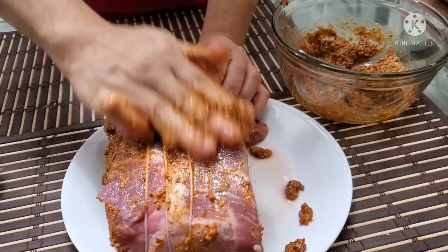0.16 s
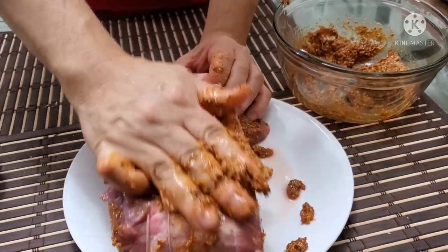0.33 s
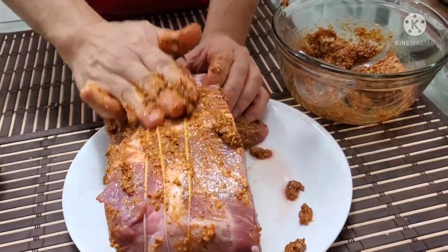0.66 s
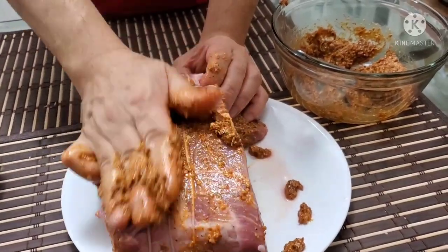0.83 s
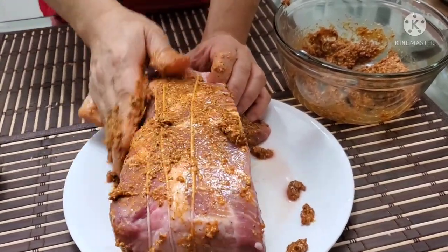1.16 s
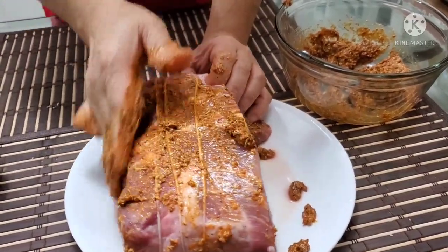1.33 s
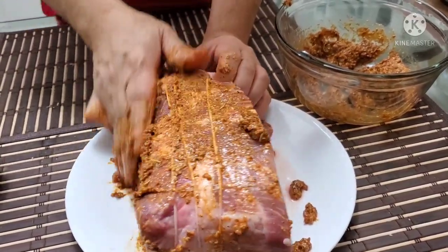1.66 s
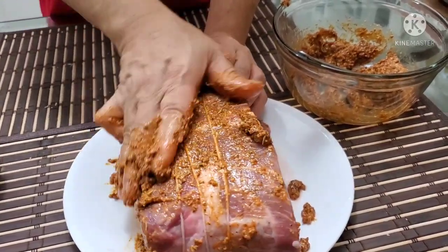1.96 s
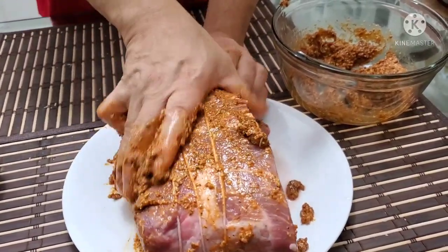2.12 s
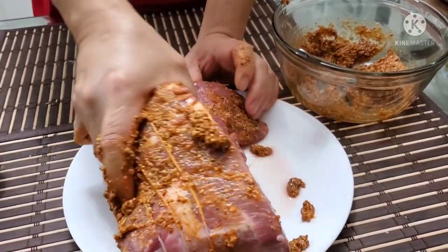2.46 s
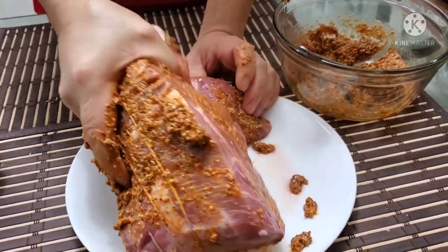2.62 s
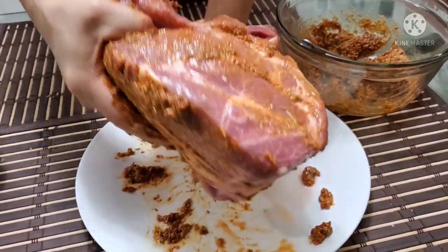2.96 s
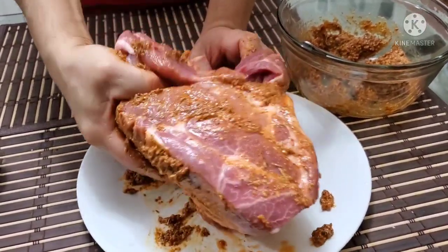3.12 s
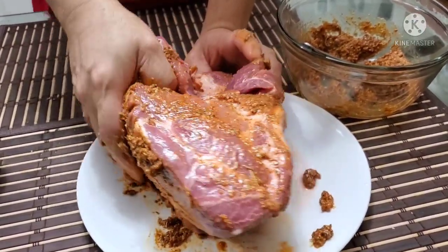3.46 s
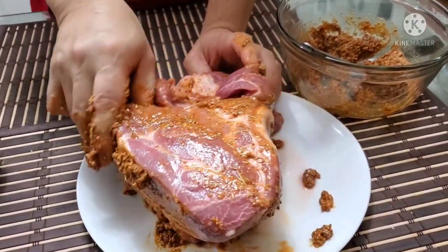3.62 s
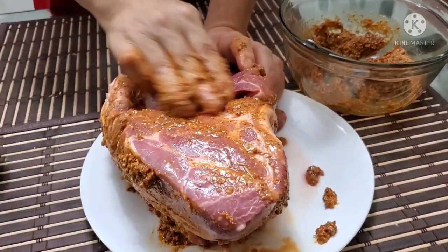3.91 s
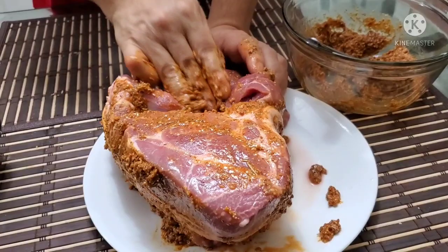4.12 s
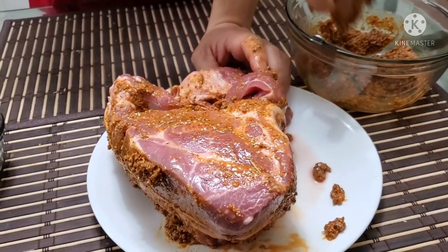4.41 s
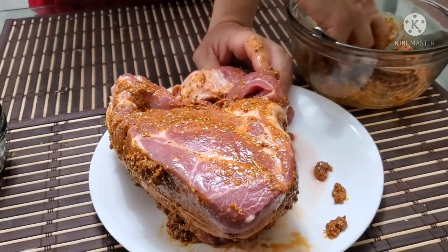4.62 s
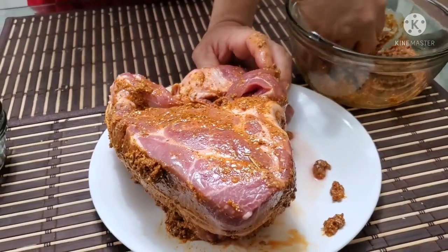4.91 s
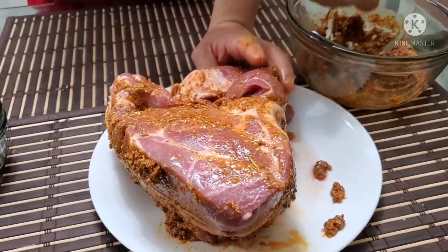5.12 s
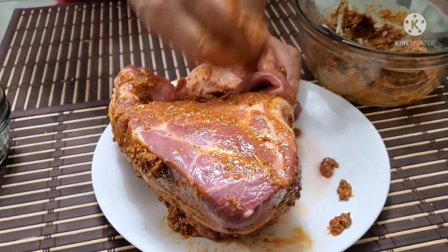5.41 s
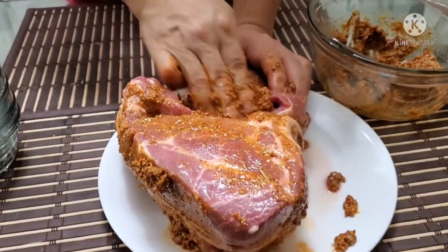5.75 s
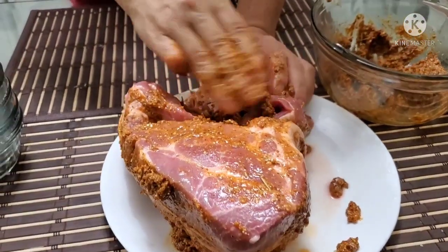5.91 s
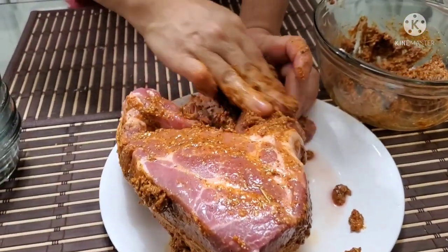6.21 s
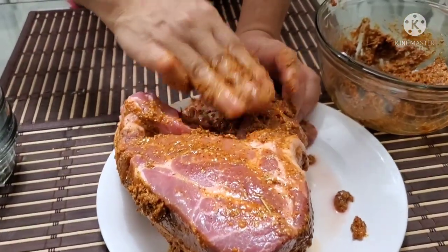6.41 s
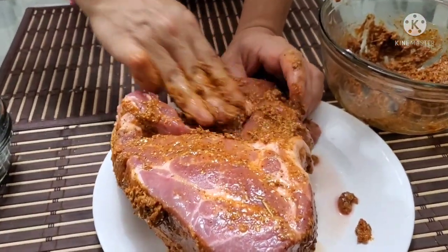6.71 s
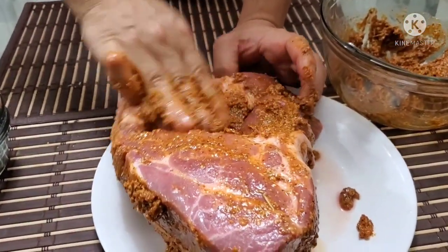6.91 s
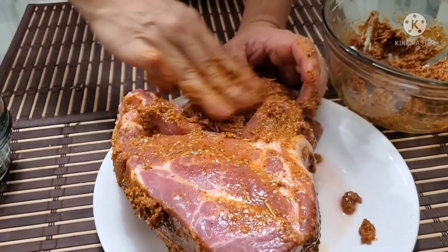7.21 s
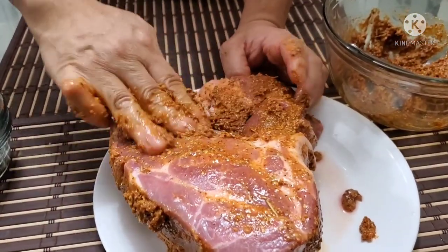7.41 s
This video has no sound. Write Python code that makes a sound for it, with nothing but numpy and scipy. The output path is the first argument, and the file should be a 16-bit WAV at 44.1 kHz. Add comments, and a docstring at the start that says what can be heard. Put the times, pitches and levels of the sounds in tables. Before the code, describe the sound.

Close stereo pickup in a small, hard kitchen. Hands rub wet, grainy paste into raw meat: uneven strokes of fine bright crackle and darker squelch, with tiny high bubble ticks and wet smacks. The strokes peak in a sticky pull, and a plate clacks onto a slatted mat. Rubbing then becomes sparse and faint, with a dull table thump and slight glass ring near five seconds. A distant clock ticks each second over low house hum.

```python
"""Hands rub a wet spice paste into a joint of raw meat: strokes of fine crackle grains and dark squelch grains.
Bubbles tick and wet skin smacks, as short ringing pops. The joint is pulled off its plate, which clacks down as
ceramic modes under a noisy clatter. Fingers bump a glass bowl and the table thumps, both as struck modes. A far
clock rasps each second through the reflections of a small hard kitchen, over the noise and drones of the house."""
import sys
import numpy as np
from scipy import signal
from scipy.fft import rfft, irfft, next_fast_len
from scipy.io import wavfile
from scipy.ndimage import map_coordinates

SR = 44100
rng = np.random.default_rng(int(sys.argv[2]) if len(sys.argv) > 2 else 0)


def gain_from_db(level_db):
    """Turn a decibel level (scalar or array-like) into a linear amplitude factor."""
    decades = np.asarray(level_db, float) / 20
    return 10 ** decades


def unload_audio(sound):
    """Save the sound as a 16-bit wav file, at the path given as the first command line argument."""
    columns = np.transpose(np.atleast_2d(sound))
    # keep every value between -1 and 1, then stretch to whole-number steps
    steps = np.round(np.clip(columns, -1, 1) * 32767)
    wavfile.write(sys.argv[1], SR, steps.astype(np.int16))


N = 333837   # length [samples]

# hand strokes through the paste: (start [s], rise [s], hold [s], crackle level [dB], squelch level [dB],
# squelch centre [Hz])
STROKES = [(0.0, 0.00059, 0.014, -66, -71.5, 3800), (0.101, 0.034, 0.042, -64, -71.5, 3640),
           (0.216, 0.031, 0.078, -71.5, -78, 3540), (0.416, 0.0069, 0.11, -69, -75.5, 2830),
           (0.513, .02, 0.091, -67, -71, 3020), (0.709, 0.047, 0.11, -63, -69, 3630),
           (1.009, .03, 0.12, -59.5, -68, 2420), (1.35, .008, 0.083, -65.5, -68, 3240),
           (1.49, .01, 0.011, -68, -65, 2230), (1.582, .05, 0.033, -58, -64, 3140),
           (1.74, .015, 0.05, -72, -86, 3600), (1.872, 0.032, 0.0076, -63.5, -72.5, 3870),
           (2.181, 0.036, .08, -74, -78.5, 2200), (2.275, .03, 0.078, -73, -72, 2120),
           (2.348, 0.0047, 0.12, -70, -67.5, 1940), (2.532, .006, .02, -71, -56.5, 3300),
           (2.592, 0.007, .12, -64, -66, 3000), (2.738, .005, 0.016, -63, -82, 2900),
           (2.906, .01, 0.0067, -62, -62, 2930), (3.116, 0.01, .02, -77.5, -91.5, 3030),
           (3.21, .01, .04, -79, -78, 3590), (3.31, 0.051, 0.034, -75.5, -92, 4120),
           (3.456, .008, .04, -73, -83, 3680), (3.564, 0.0046, 0.078, -68, -71.5, 3450),
           (3.805, .008, 0.021, -75, -84, 2950), (3.9, 0.0086, .06, -87.5, -82, 2100),
           (4.03, .015, .06, -79.5, -81.5, 2097), (4.1, .01, 0.075, -75, -86.5, 2500),
           (4.26, 0.013, 0.037, -87.5, -78.5, 1970), (4.555, .008, .04, -72.5, -77.5, 2600),
           (4.743, .01, .06, -77.5, -85, 2600), (4.954, 0.013, 0.018, -70, -72, 2520),
           (5.514, .012, .03, -77, -79.5, 3560), (5.604, 0.00567, .02, -69.5, -76.5, 3700),
           (5.654, .006, .02, -73, -94, 3500), (5.686, 0.0042, 0.004, -68, -65.5, 2230),
           (5.844, 0.025, .03, -78.5, -88.5, 2500), (6.046, 0.032, 0.11, -78.5, -93.5, 1980),
           (6.252, 0.022, .04, -73.5, -86, 2400), (6.353, 0.017, 0.044, -83, -87, 2400),
           (6.591, 0.054, 0.066, -73.5, -91.5, 3500), (6.626, 0.0075, .02, -87, -76, 2500),
           (6.908, 0.0086, 0.032, -78, -88.5, 3720), (6.98, 0.045, 0.034, -74.5, -78, 3900),
           (7.288, 0.018, 0.026, -67.5, -80.5, 3900), (7.501, 0.052, .05, -73.5, -80, 3900)]
# colour of the fine crackle: (frequency [Hz], relative level per Hz [dB])
CRACKLE_COLOUR = [(2650, -29), (4500, -6.5), (5680, -7.5), (6700, -1), (7690, -6), (9870, -1.5),
                  (11800, -8.5), (14900, -10.5), (16000, -12.5)]
# colour of the squelch before each stroke is centred: (frequency [Hz], relative level per Hz [dB])
SQUELCH_COLOUR = [(530, -45), (900, -17.5), (1310, -6), (1550, -5.5), (2120, -6), (2480, -6), (2820, -8.5),
                  (3850, 0), (5500, -5.5), (7150, -44.5), (12100, -120)]
# tiny bubbles in the paste burst: (time [s], peak before panning [dB], pitch [Hz], left over right [dB])
BUBBLES = [(0.1471, -51.5, 8750, -3), (0.1935, -58, 9300, -6), (0.5043, -57, 6860, -21),
           (0.5332, -32, 10600, 7.5), (0.6055, -48, 9200, 13), (0.633, -45, 9800, 11),
           (0.7557, -42.5, 9400, 3), (0.7976, -41, 6900, -11), (0.9004, -50, 8800, -4),
           (1.0241, -47, 6860, 9), (1.1223, -48, 14000, 12), (1.1628, -43, 10100, 11),
           (1.3468, -56.5, 6400, -12), (1.6062, -61, 11300, 15), (1.6496, -46, 8460, 4),
           (1.7429, -43.5, 10680, 12), (1.7729, -48.5, 13990, 12), (1.8956, -47, 9450, 8),
           (1.9101, -41.5, 8900, 18), (2.1834, -59.5, 10500, 11), (2.3161, -50, 9380, -18),
           (2.3555, -49, 9860, -10), (2.4872, -57.5, 7180, -12), (2.5591, -47, 14540, 11),
           (2.58, -51, 8860, 14), (2.601, -45, 6287, -7), (2.6648, -39.5, 8710, -5.5),
           (2.7172, -48.5, 6840, -10), (2.7417, -37, 6360, -7), (2.7601, -34, 11000, 6),
           (2.9113, -45, 9600, 7), (2.9357, -44.5, 9980, 7.5), (3.2221, -56.5, 8430, -1.5),
           (3.3014, -49, 11100, 8.5), (3.3648, -54.5, 11160, 12), (3.4261, -58, 10470, 16.5),
           (3.4501, -42.5, 10070, 13), (3.5723, -49, 12200, 9.5), (3.8257, -40.5, 11800, 5.5),
           (4.126, -50, 8390, 6), (4.1839, -58, 8360, 11), (4.6059, -59.5, 10300, -16),
           (4.7481, -57.5, 10510, -9.5), (5.5907, -39.5, 9170, 10), (5.6625, -49.5, 6900, -4),
           (5.6935, -37, 9080, 5), (5.888, -61.5, 7630, 3), (6.4004, -55, 8420, 1.5),
           (7.013, -50.5, 8160, 5.5), (7.0394, -47.5, 14140, 13), (7.3123, -40.5, 12500, 6),
           (7.5168, -54, 6570, -5.5)]
# wet skin parts from the meat: (time [s], peak before panning [dB], pitch [Hz], left over right [dB])
SMACKS = [(0.0332, -56, 4240, -17), (0.606, -41.5, 3600, 0.5), (1.034, -54, 3850, 6),
          (1.3473, -44, 3280, 1), (1.5025, -56, 2120, 14), (1.6062, -45, 2390, 3),
          (1.6322, -34, 4100, 14.5), (1.6496, -43, 2240, -12), (1.9101, -55, 4100, 17),
          (2.5356, -26, 3301, -0.5), (2.5484, -32.5, 3000, 3), (2.5995, -38.5, 2790, -1),
          (2.6958, -37.5, 3250, 2), (2.7417, -18, 3630, -7.5), (2.7554, -31, 2420, 5),
          (3.2221, -51.5, 3230, 6.5), (3.5738, -48, 3540, 14), (3.6117, -58, 3500, 19),
          (5.5218, -53, 3860, 13.5), (5.5932, -42, 3840, 13.5), (5.662, -61, 3870, -9),
          (5.6935, -45, 2040, 8), (6.6263, -51, 2500, -11), (7.5467, -54.5, 4240, 13.5)]
# the plate drops back on the mat and bounces: (time [s], relative strength [dB])
PLATE_CONTACTS = [(2.804, -9.5), (2.8063, -15.5), (2.811, -18.5), (2.816, -26), (2.821, -20),
                  (2.830, -17.5)]
# ringing modes of the ceramic plate: (frequency [Hz], relative level [dB], t60 [s])
PLATE_MODES = [(645, -13, 0.12), (718.6, -8.5, 0.29), (850.4, -11, 0.15), (1130, -8.5, 0.032),
               (1271, -4, 0.08), (1347, -1.5, 0.058), (1600, -14, 0.087), (1756, -8.5, 0.11),
               (1900, -4, 0.041), (2128, -6.5, 0.067), (2584, -2.5, 0.031), (3255, -7, 0.16),
               (3640, -14, 0.045), (4050, -14.5, .1), (6417, -23.5, 0.15)]
# colour of the mat's slats slapping: (frequency [Hz], relative level per Hz [dB])
CLATTER_COLOUR = [(260, -50), (450, -32), (709, -7.5), (1100, -12), (1330, -1.5), (1460, -6), (2620, -5.5),
                  (4990, -17.5), (5700, -32.5), (8980, -25), (15000, -46)]
# blows on the table top: (time [s], relative strength [dB], hardness as low-pass cutoff [Hz],
# ring share scaling the t60 [ratio], rattle start level [dB])
THUMPS = [(0.721, -47, 120, 1, -78), (1.504, -34.5, 306, 0.3, -63), (2.805, -32.5, 147.9, 0.7, -53),
          (3.12, -47, 248, 0.68, -61), (4.57, -51, 496, 0.46, -68), (4.602, -42, 120, .5, -72),
          (4.9658, -19, 252, 1.0, -59), (5.331, -39.5, 200.5, 0.42, -82.5), (6.13, -52.5, 151.5, 0.3, -83)]
# ringing modes of the table: (frequency [Hz], relative level [dB], t60 before the ring share [s])
TABLE_MODES = [(60, -6.5, .2), (71.85, -4.5, 0.4), (100, 0, .3), (133.3, 2, .47), (175.1, -3, .36),
               (240, -1.5, .15), (332, -15.5, 0.23), (468, -16, 0.33)]
# fingers on the glass: (time [s], relative strength [dB])
BOWL_HITS = [(4.572, -73.5), (4.965, -43.5)]
# ringing modes of the glass bowl: (frequency [Hz], relative level [dB], t60 [s])
BOWL_MODES = [(1600, -6, .1), (1640, -3, .14), (2200, -14, .08), (2865, -6, .16), (2902, 0, .22),
              (2945, -9, .1), (4447, -8, .13), (4506, -7, .18), (4565, -11, .15), (6406, -16, .12)]
# each clock tick in turn, before the room: (level [dB])
CLOCK_LEVELS = [-64, -60, -71, -66.5, -67, -67, -78, -71.5]
# decay of the kitchen in octaves: (octave centre [Hz], t60 [s], relative level [dB])
ROOM_OCTAVES = [(344, 0.67, -7), (650, .4, 4), (1460, 0.51, -1), (2900, 0.46, -1.5), (5600, 0.21, 1),
                (11000, .3, 3.5)]
# colour of the house noise: (frequency [Hz], relative level per Hz [dB])
HOUSE_COLOUR = [(13, -44), (22, -16), (55, -3.5), (136, -9.5), (194, -4), (270, -10.5), (328, -9),
                (387, -10.5), (510, -14.5), (837, -20.5), (1100, -31), (3420, -33), (5610, -43),
                (14700, -45.5), (16000, -48.5)]
# narrow drones of appliances: (frequency [Hz], width [Hz], typical rms level [dB])
DRONES = [(54.7, 16, -75), (120, 32, -78.5), (191.34, 8.5, -67), (262.8, 21, -71), (594, 28, -82)]
# how alike the house noise is at left and right: (frequency [Hz], likeness [-1 to 1])
LIKENESS = [(50, 0.66), (250, 1), (1000, 0.11), (4000, 0.11), (12000, .2)]


def rms_one(x):
    """Scale to an rms of 1."""
    return x / np.sqrt(np.mean(x ** 2) + 1e-20)


def at_hz(points, hz):
    """Read a curve of values against frequency, straight on a log frequency axis."""
    point_hz, value = np.array(points)[:, 0], np.array(points)[:, 1]
    return np.interp(np.log(hz), np.log(point_hz), value)


def band(x, low_hz, high_hz):
    """Keep the band between two frequencies."""
    return signal.sosfilt(signal.butter(2, [low_hz, min(high_hz, .45 * SR)], "band", fs=SR, output="sos"), x)


def drift(rate):
    """Slow random wander: normal knots of spread 1, joined by straight lines at the given rate per second."""
    knots = rng.standard_normal(int(N / SR * 60) + 4)
    return map_coordinates(knots, [np.arange(N) / SR * min(rate, 60)], order=1)


def coloured(x, spectrum):
    """Weight the spectrum of x by a colour curve, then scale to an rms of 1."""
    size = next_fast_len(N)
    hz = np.maximum(np.arange(size // 2 + 1) * SR / size, 1)
    weighted = rfft(x, size) * gain_from_db(at_hz(spectrum, hz))
    return rms_one(irfft(weighted, size)[..., :N])


def panned(x, left_db):
    """Place a sound by level; the louder port hears it a few samples later."""
    port_lag_s = 0.000136
    n = np.arange(len(x))
    lag = -np.sign(left_db) * port_lag_s * SR / 2
    left = np.interp(n - 4 + lag, n, x) * gain_from_db(left_db / 2)
    right = np.interp(n - 4 - lag, n, x) * gain_from_db(-left_db / 2)
    return np.array([left, right])


def resonator(hz, t60):
    """Feedback coefficients, decay per sample and angle per sample of one decaying sine mode."""
    r, w = gain_from_db(-60 / (t60 * SR)), 2 * np.pi * hz / SR
    return [1, -2 * r * np.cos(w), r * r], r, w


def struck(times, strengths_db, modes, spread_db):
    """Every blow sets all modes ringing, each with a random strength of its own."""
    at, out = np.round(np.array(times) * SR).astype(int), np.zeros(N)
    chance = rng.standard_normal((len(at), len(modes)))
    for k, (hz, level_db, t60) in enumerate(modes):
        clicks = np.full(N, 1e-18)
        clicks[at] = gain_from_db(np.array(strengths_db) + level_db + spread_db * chance[:, k])
        feedback, _, w = resonator(hz, t60)
        out += signal.lfilter([0, np.sin(w)], feedback, clicks)
    return out


def grains(per_s, size_db, low_hz, high_hz, cycles, spread):
    """Clumps of bursts of widely spread size, each dealt one of ten pitches and a place on the meat; rms 1."""
    born = rng.random(N) < per_s * gain_from_db(6 * drift(25)) / SR
    sizes = born * gain_from_db(size_db * np.minimum(rng.exponential(1, N), 5)) * rng.choice([-1, 1], N)
    where, dealt, out = spread * rng.uniform(-1, 1, N), rng.integers(0, 10, N), 0
    for k, hz in enumerate(np.geomspace(low_hz, high_hz, 10)):
        clicks = sizes * (dealt == k) * np.sqrt(hz) + 1e-18
        pair = [clicks * (1 + where), np.roll(clicks * (1 - where), k % 5)]
        feedback, r, _ = resonator(hz, cycles / hz)
        out = out + signal.lfilter([1 - r, 0, r - 1], feedback, pair)
    return rms_one(out)


def stroked(levels_db, fade_db_per_s):
    """Each stroke rises, sags as the paste thins under the sliding hand, then fades; their powers add."""
    sag_db_per_s = 24
    t, power = np.arange(0, N, 32) / SR, 0
    for (s, rise_s, hold_s, *_), db in zip(STROKES, levels_db):
        rise = np.clip((t - s) / max(rise_s, 1 / SR), 0, 1)
        held = np.clip(t - s - rise_s, 0, hold_s)
        after = np.maximum(t - s - rise_s - hold_s, 0)
        power = power + (rise * gain_from_db(db - sag_db_per_s * held - fade_db_per_s * after)) ** 2
    return np.interp(np.arange(N) / SR, t, np.sqrt(power))


def crackle(levels_db):
    """Fine bright bursts over a hiss of sliding skin, leaning to the left."""
    fine = grains(1200, 3.5, 5500, 15500, cycles=7, spread=.8) + .7 * rng.standard_normal((2, N))
    return stroked(levels_db, fade_db_per_s=130) * coloured(fine, CRACKLE_COLOUR) * gain_from_db([[1.5], [-1.5]])


def squelch(levels_db, centres_hz):
    """Darker, denser, smoother wet bursts, split in third octaves so that each stroke has its own centre."""
    fall_db = 16.0   # loss one octave from the centre, growing as the square of the distance
    wet = grains(1200, 3.0, 1100, 5000, cycles=9, spread=.6) + .8 * rng.standard_normal((2, N))
    wet = coloured(wet, SQUELCH_COLOUR)
    edges = 900 * 2 ** np.arange(0, 3.1, 1 / 3)
    # neighbouring bands take opposite signs
    parts = np.array([(-1) ** k * band(wet, low, high) for k, (low, high) in enumerate(zip(edges, edges[1:]))])
    middle_hz = np.sqrt(edges[:-1] * edges[1:])[:, None]
    colour_db = -fall_db * np.log2(middle_hz / centres_hz) ** 2
    # the bands of a stroke together carry its stated power
    colour_db = colour_db - 10 * np.log10(parts.var(axis=(1, 2)) @ gain_from_db(2 * colour_db))
    return sum(part * stroked(levels_db + db, fade_db_per_s=115) for part, db in zip(parts, colour_db))


def rubbing():
    """Crackle and squelch of every stroke, made uneven as the hand sticks and slips."""
    slip_db, slips_per_s = 0.5, 57
    *_, crackle_db, squelch_db, centres_hz = np.transpose(STROKES)
    return gain_from_db(slip_db * drift(slips_per_s)) * (crackle(crackle_db) + squelch(squelch_db, centres_hz))


def pops(rows, cycles, broad, tear_db, tear_s):
    """A cavity rings and dies 60 dB in some cycles, with a broad snap and the longer noise of the film tearing."""
    length = 1500   # samples
    out, t = np.zeros((2, N + length)), np.arange(length) / SR
    snaps = rng.standard_normal((len(rows), length))
    for (s, peak_db, hz, left_db), snap in zip(rows, snaps):
        shape = (1 - np.exp(-t * hz * 1.5)) * gain_from_db(-60 * t * hz / cycles)
        noise = band(snap, hz * 0.53, hz * 1.1)
        cavity = shape * (np.sin(2 * np.pi * hz * t) + broad * noise)
        body = cavity + gain_from_db(tear_db - 60 * t / tear_s) * noise
        i = round(s * SR)
        out[:, i:i + length] += panned(gain_from_db(peak_db) * body / np.abs(body).max(), left_db)
    return out[:, :N]


def bubble_ticks():
    """Tiny bubbles burst with a high, fairly pure ring."""
    return pops(BUBBLES, cycles=29, broad=0.31, tear_db=-12.0, tear_s=0.01)


def skin_smacks():
    """Wet skin parts with a lower, noisier and more damped ring."""
    return pops(SMACKS, cycles=11, broad=.8, tear_db=-23.0, tear_s=0.12)


def plate():
    """Ceramic modes, damped by the meat, under a broad clatter of mat slats that flares at each contact."""
    s, strength_db = np.transpose(PLATE_CONTACTS)
    t = np.arange(N) / SR
    # each flare rises in 0.91 ms and dies at 60 dB in 40 ms
    flares = sum(np.clip((t - a) / 0.00091, 0, 1) * gain_from_db(db - 7.5 - 60 * np.abs(t - a) / 0.04)
                 for a, db in PLATE_CONTACTS)
    ring = struck(s, strength_db - 10, PLATE_MODES, spread_db=2)
    mid, side = coloured(rng.standard_normal((2, N)), CLATTER_COLOUR)
    both = ring + flares * (mid + 0.49 * side * [[1], [-1]])
    return signal.sosfilt(signal.butter(3, 480, "high", fs=SR, output="sos"), both)


def bowl():
    """A wet fingertip lands softly, so the glass modes swell over 29 ms from silence at each touch."""
    ring = struck(*np.transpose(BOWL_HITS), BOWL_MODES, spread_db=2.5)
    t = np.arange(N) / SR
    swells = [np.where(t < s, 1, np.clip((t - s) / 0.029, 0, 1)) for s, _ in BOWL_HITS]
    return ring * np.prod(swells, axis=0)


def table():
    """A soft contact is a low-passed click into the table modes; the mat and dishes rattle briefly."""
    out, rattle, t = np.zeros(N), np.zeros(N), np.arange(N) / SR
    noise = rms_one(band(rng.standard_normal(N), 250, 2000))
    for s, strength_db, hard_hz, share, rattle_db in THUMPS:
        modes = [(hz, db, t60 * np.clip(share, .1, 1.5)) for hz, db, t60 in TABLE_MODES]
        ring = struck([s], [strength_db - 11.0], modes, spread_db=3.0)
        out += signal.sosfilt(signal.butter(2, max(hard_hz, 30), fs=SR, output="sos"), ring)
        rattle += (t >= s) * gain_from_db(rattle_db - 60 * np.abs(t - s) / 0.04) * noise
    thump = signal.sosfilt(signal.butter(2, 45, "high", fs=SR, output="sos"), out)
    return thump, rattle


def clock():
    """One tick a second: a short narrow rasp of the hand stepping, made to be heard through the room alone."""
    first_s, length_s = .112, 0.03
    centre_hz, width_hz = 1790, 280
    count, since = np.divmod(np.arange(N) / SR - first_s, 1)
    step = np.sin(np.pi * np.clip(since / length_s, 0, 1)) ** .5
    rasp = band(rng.standard_normal(N), centre_hz - width_hz / 2, centre_hz + width_hz / 2)
    return gain_from_db(np.array(CLOCK_LEVELS)[count.astype(int)]) * step * rms_one(rasp)


def kitchen(x, near_db=-2.0, near_t60=0.03, walls_s=0.0043):
    """Dense reflections off plate and table, then walls, each octave dying at its own rate, unlike at the two ears."""
    t = np.arange(SR // 2) / SR
    tail = sum(gain_from_db(db - 60 * t / t60) * band(rng.standard_normal((2, len(t))), hz / np.sqrt(2), hz * np.sqrt(2))
               for hz, t60, db in ROOM_OCTAVES)
    walls = np.clip(t / walls_s, 0, 1) ** 2
    near = gain_from_db(near_db - 60 * t / near_t60)
    tail = tail * (walls + near) * np.clip(t / 0.0018, 0, 1)
    unit_tail = tail / np.sqrt(np.sum(tail ** 2) / 2)
    return signal.fftconvolve(x[None], unit_tail, axes=1)[:, :N]


def house():
    """Broad rumble and hiss, flickering band by band, with the narrow drones of appliances."""
    noise_db = -65.5   # rms
    out, edges = 0, 20 * 2 ** np.arange(0, 10, .5)
    white = rng.standard_normal((2, 2, N))
    for k, (low, high) in enumerate(zip(edges, np.append(edges[1:], 20000))):
        mid, side = band(white[k % 2], low, high)   # neighbouring bands use separate noise
        alike = np.clip(at_hz(LIKENESS, np.sqrt(low * high)), -1, 1)
        pair = np.sqrt(1 + alike) * mid + np.sqrt(1 - alike) * side * [[1], [-1]]
        out = out + gain_from_db(1.3 * drift(2.6)) * pair
    out = gain_from_db(noise_db) * coloured(out, HOUSE_COLOUR)
    for hz, width_hz, level_db in DRONES:
        drone = rms_one(band(rng.standard_normal(N), hz - width_hz / 2, hz + width_hz / 2))
        out = out + gain_from_db(level_db + 2.0 * drift(2.5)) * drone
    return out


def scene():
    """Mix the direct sounds, their sends into the kitchen, the rubbing and the house."""
    ticks, smacks = bubble_ticks(), skin_smacks()
    clack, glass = plate(), bowl()
    thump, rattle = table()
    sent = gain_from_db(-9) * ticks.mean(0) + gain_from_db(2) * smacks.mean(0)
    sent = sent + gain_from_db(-9) * clack[0] + gain_from_db(-2.0) * glass + gain_from_db(8.5) * rattle + clock()
    direct = ticks + smacks + gain_from_db(-4.0) * clack + gain_from_db(-2.5) * glass + thump + rattle
    return direct + kitchen(sent) + rubbing() + house()


def top_cut(x):
    """Nothing passes above the cut-off."""
    return signal.sosfilt(signal.butter(12, 16510, fs=SR, output="sos"), x)


def record(dry):
    """The right port takes a little more bass; the housing cuts a notch and lifts the treble below a steep cut."""
    right_bass_db = 3.5
    notch_hz, notch_width_hz, notch_depth = 5740, 1200, 0.53
    lift_hz, lift_width_hz, lift = 15300, 3200, 1
    bass = signal.sosfilt(signal.butter(1, 700, fs=SR, output="sos"), dry)
    x = dry + bass * (gain_from_db([[-right_bass_db / 2], [right_bass_db / 2]]) - 1)
    b, a = signal.iirpeak(notch_hz, notch_hz / notch_width_hz, fs=SR)
    x = x - notch_depth * signal.lfilter(b, a, x)
    b, a = signal.iirpeak(lift_hz, lift_hz / lift_width_hz, fs=SR)
    x = x + lift * signal.lfilter(b, a, x)
    x = signal.sosfilt(signal.cheby2(12, 40, 16300, fs=SR, output="sos"), x)
    return top_cut(x)


dry = scene()
out = record(dry)
unload_audio(out)
```